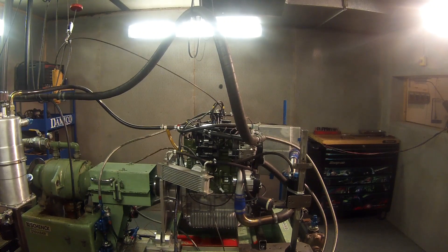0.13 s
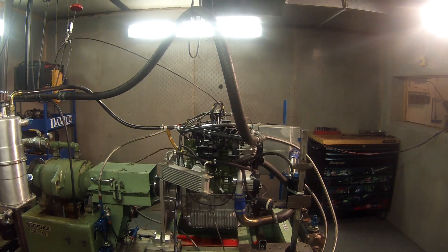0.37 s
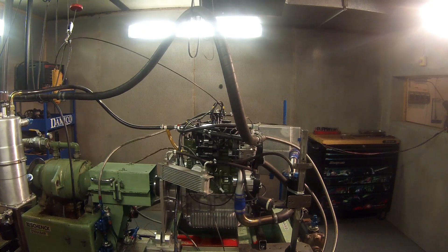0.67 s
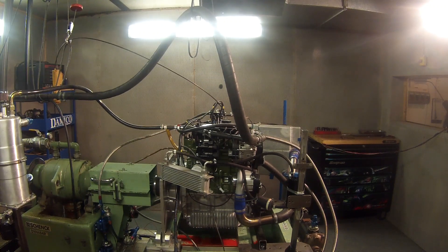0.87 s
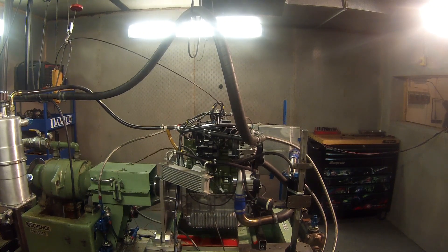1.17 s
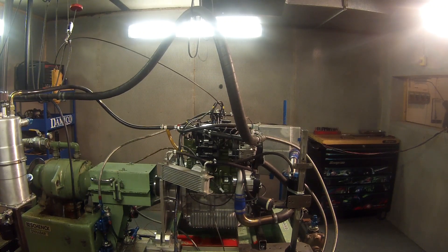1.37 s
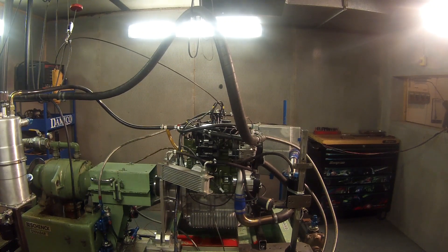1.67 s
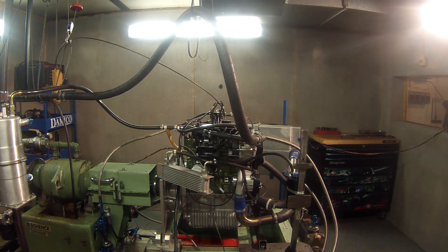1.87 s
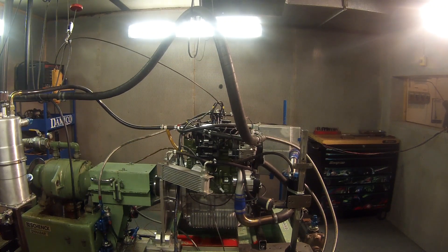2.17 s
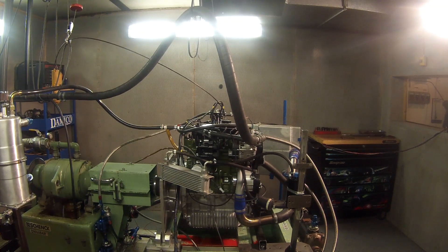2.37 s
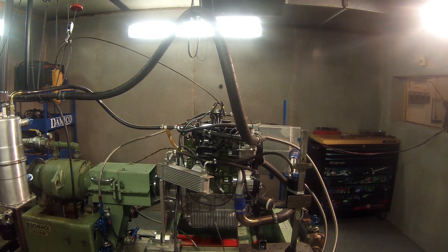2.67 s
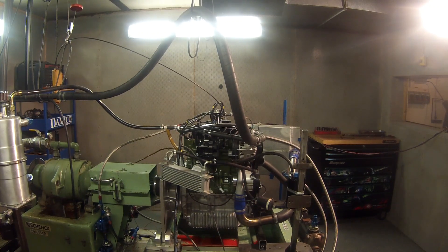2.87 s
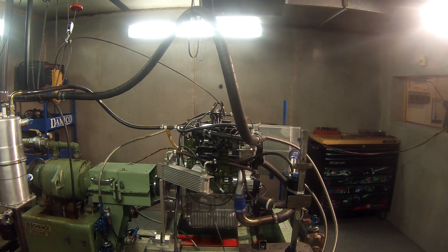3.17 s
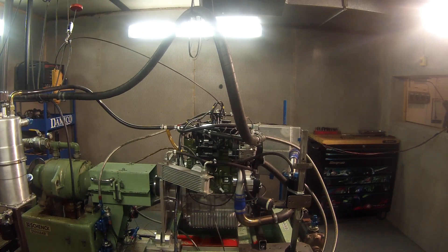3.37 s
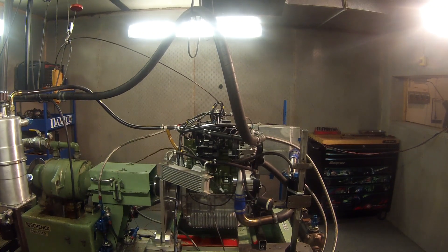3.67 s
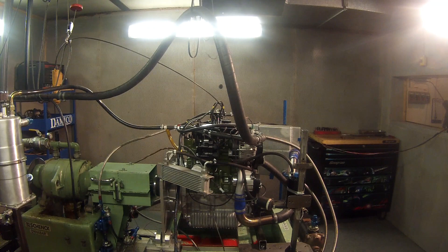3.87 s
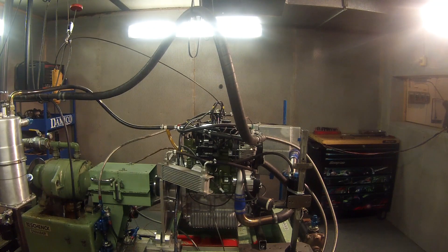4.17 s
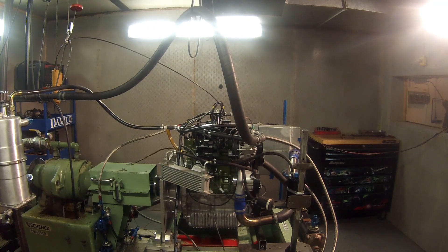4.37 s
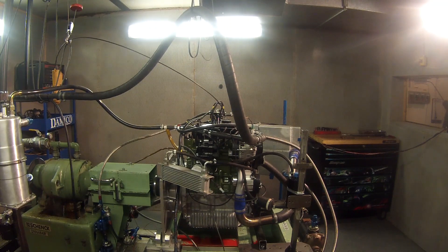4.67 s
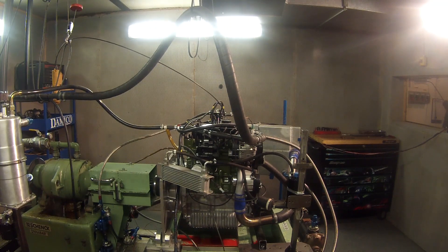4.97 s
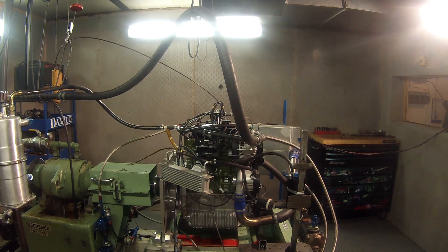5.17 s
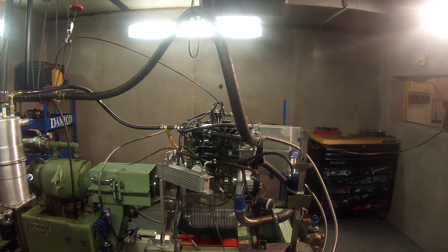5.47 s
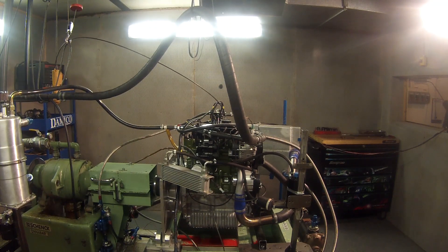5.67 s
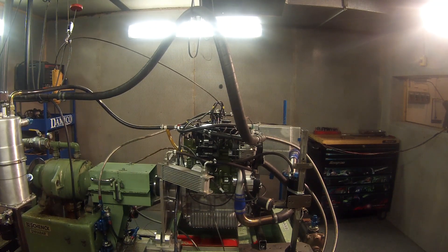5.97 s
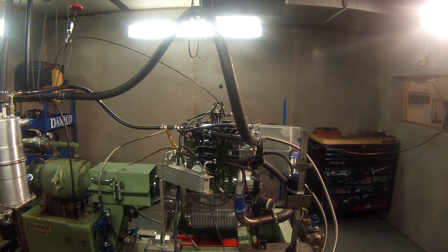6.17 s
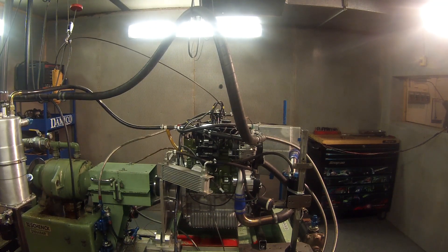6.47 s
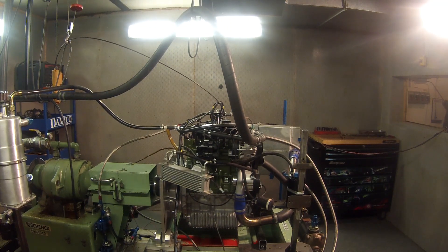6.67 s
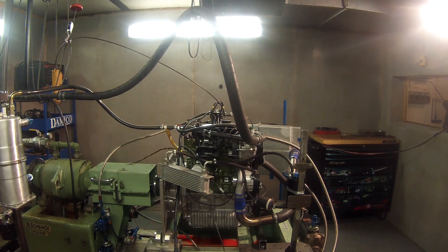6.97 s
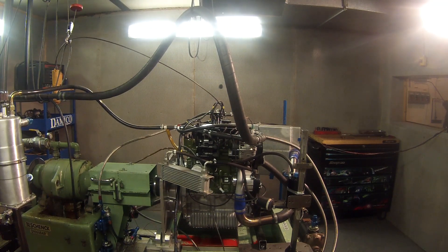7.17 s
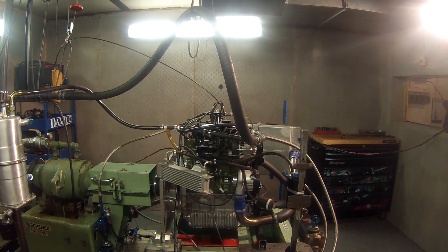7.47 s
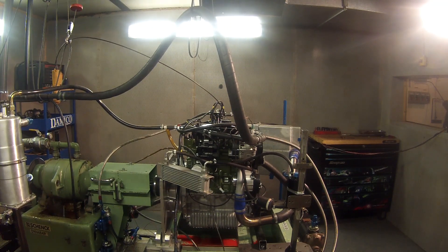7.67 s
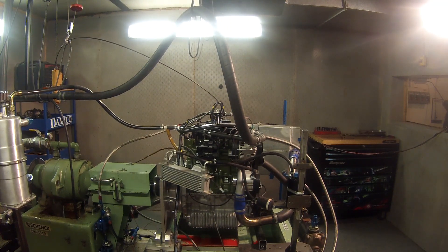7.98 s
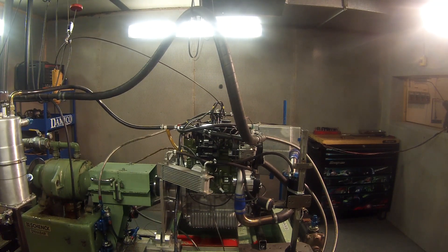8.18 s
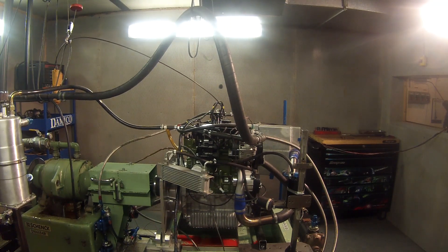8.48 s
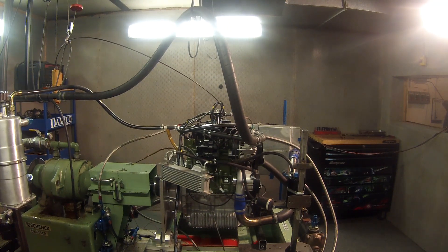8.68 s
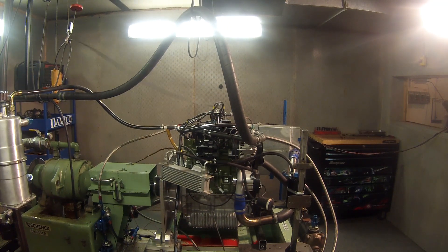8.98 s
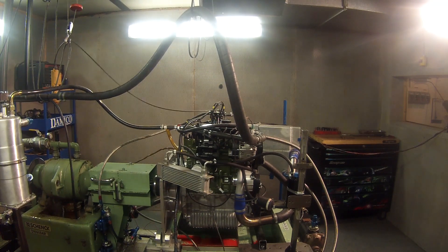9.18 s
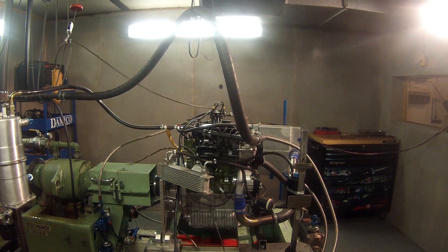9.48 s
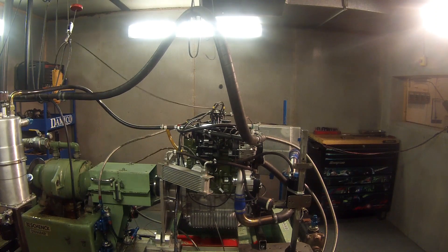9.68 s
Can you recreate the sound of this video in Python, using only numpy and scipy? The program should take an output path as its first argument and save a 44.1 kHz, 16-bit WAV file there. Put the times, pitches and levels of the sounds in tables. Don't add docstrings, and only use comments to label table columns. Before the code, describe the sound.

In a hard-walled test cell, a supercharged four-cylinder engine roars at constant high revs: a strong low firing drone near 200 Hz, piercing metallic ringing near 3.7 kHz, rushing air and a flickering 10 kHz blower whistle. At about nine seconds the throttle shuts; the roar collapses into quick bright puffs of air, twelve a second, over falling, misfiring low tones that boom in the room. One fixed microphone, loud and slightly compressed.

```python
import sys
import numpy as np
from scipy import signal
from scipy.fft import rfft, irfft, next_fast_len
from scipy.io import wavfile

SR = 44100
rng = np.random.default_rng(int(sys.argv[2]) if len(sys.argv) > 2 else 0)


def natural_amplitude(level_db):
    exponent = np.asarray(level_db, float) / 20
    return 10 ** exponent


def log_audio(samples):
    frames = np.atleast_2d(samples).T
    limited = np.clip(frames, -1, 1)
    pcm = np.round(limited * 32767).astype(np.int16)
    wavfile.write(sys.argv[1], SR, pcm)


N = 433923
TIME = np.arange(N) / SR
HELD_HZ = 49.868

# time in seconds, level in dB.
LOAD_DB = [(0, 0.1), (1, -0.5), (2, 0.55), (3.3, -0.1), (4, 0.1), (7, -0.1), (8.25, 0.65), (8.6, 0.5),
           (9.84, 1.5)]
# centre in Hz, width in Hz, # level in the rush in dB, level
# in the surge in dB.
RESONANCE_PEAKS = [(2101, 69, -55, 0.5), (2294, 44, -66.5, -1), (3687, 240, -53.5, 0.5),
                   (4030, 320, -58.5, -18), (4245, 83, -57, 1), (4580, 60, -63, -4), (4890, 190, -56, -1),
                   (5100, 73, -78, -6), (5760, 220, -58, 0), (6440, 120, -61, -1), (7000, 160, -61, -15),
                   (7560, 140, -73.5, -13), (8380, 340, -64, -5.5), (8690, 130, -63, -2.5),
                   (9920, 1100, -66, -18), (10740, 750, -64.5, -8), (12600, 760, -73, -22),
                   (15100, 300, -82, -30)]


def engine(cycles):
    # multiple of the cycle rate, level in dB rms.
    exhaust_lines = [(1, -54.2), (2, -48.4), (3, -49.2), (4, -23.3), (5, -51.6), (6, -45.6), (7, -60.3),
                     (8, -36.2), (9, -50.2), (10, -44.7), (11, -61.3), (12, -35.1), (13, -52.4),
                     (14, -45.6), (15, -55.8), (16, -47.4), (17, -57.5), (18, -36.3), (19, -49.4),
                     (20, -46.4), (21, -64.3), (22, -58.7), (23, -47.4), (24, -51.0), (25, -69.3),
                     (26, -46.8), (27, -43.6), (28, -53.3), (29, -62.8), (30, -39.6)]
    intake_lines = [(31, -42.1), (32, -46.8), (34, -39.9), (35, -45.3), (36, -46.0), (37, -39.2),
                    (38, -39.1), (39, -44.9), (40, -45.4), (41, -35.2), (42, -35.3), (43, -31.5),
                    (45, -49.4), (46, -36.2), (47, -35.8), (48, -45.1), (49, -49.5), (50, -36.9),
                    (51, -46.3), (53, -39.3), (54, -47.7), (56, -48.0), (57, -42.1), (58, -43.8),
                    (59, -47.0), (60, -45.9), (61, -49.2), (62, -37.2), (63, -40.7), (65, -39.8)]
    block_lines = [(67, -36.0), (69, -38.7), (70, -34.3), (71, -31.8), (72, -38.2), (73, -24.6),
                   (74, -31.2), (75, -27.8), (76, -30.4), (77, -34.9), (78, -34.1), (79, -42.8),
                   (80, -30.1), (81, -44.2), (82, -39.7), (83, -37.1), (84, -41.0), (85, -34.0),
                   (86, -36.6), (87, -42.7), (88, -46.7), (89, -38.4), (91, -39.1), (93, -41.9),
                   (95, -46.5), (96, -44.4), (97, -43.3), (98, -36.7), (99, -35.5), (100, -45.7)]
    valve_lines = [(101, -43.7), (102, -42.0), (103, -33.6), (106, -41.7), (107, -39.3), (109, -44.4),
                   (111, -42.4), (112, -44.7), (114, -38.5), (115, -35.9), (116, -42.6), (117, -39.6),
                   (118, -37.9), (119, -45.5), (122, -45.7), (123, -39.6), (126, -45.5), (127, -42.1),
                   (129, -43.9), (131, -35.1), (135, -41.5), (136, -40.8), (139, -38.7), (140, -41.1),
                   (142, -45.6), (144, -40.8), (147, -42.3), (148, -39.7), (150, -44.2), (152, -45.7),
                   (161, -46), (168, -47), (184, -52), (192, -49)]
    load_db = curve(LOAD_DB)
    exhaust_cut_db = cut_db(9.045, 500)
    intake_cut_db = cut_db(9.02, 300)
    ring_cut_db = cut_db(8.985, 280)

    pipe = lines(exhaust_lines[1:8], cycles, sway_db=0.48, slip_rad=0.09, rate_hz=2.3, spread=0.25)
    pipe += shake(cycles)
    metal = lines(exhaust_lines[8:], cycles, sway_db=1.2, slip_rad=0.1, rate_hz=1.2, spread=0.15)
    metal += natural_amplitude(0.2) * lines(intake_lines, cycles, sway_db=1.6, slip_rad=0.28, rate_hz=3.5, spread=0.13)
    metal *= natural_amplitude(intake_cut_db - ring_cut_db)
    metal += natural_amplitude(-0.26) * lines(block_lines, cycles, sway_db=1.6, slip_rad=0.35, rate_hz=6.0, spread=0.29)
    ticking = valve_lines
    metal += natural_amplitude(-0.54) * lines(ticking, cycles, sway_db=2.5, slip_rad=0.55, rate_hz=4.5, spread=0.21)
    return natural_amplitude(load_db + exhaust_cut_db) * pipe + natural_amplitude(load_db - 0.16 + ring_cut_db) * metal


def lines(orders, cycles, sway_db, slip_rad, rate_hz, spread):
    out = np.zeros(N)
    cylinder = rng.integers(0, 4, 40)
    for multiple, level_db in orders:
        k = round(multiple)
        sway = drift(rate_hz)
        turns = k * (cycles - cylinder[(k + 2) // 6] / 4)
        scatter = spread * (2 if k < 40 else 1)
        angle = 2 * np.pi * (turns + scatter * rng.standard_normal()) + slip_rad * drift(rate_hz)
        sine = np.sin((angle % (2 * np.pi)).astype(np.float32))
        out += natural_amplitude(level_db + 3) * (1 + sway_db / 8.7 * sway) * sine
    return out


def whistle(cycles):
    gear_multiple = 200.36
    angle = 2 * np.pi * gear_multiple * cycles + 0.7 * drift(12.0) + 2.7 * drift(3.0)
    level_db = -33 + cut_db(8.965, 530) + 3 + 2.2 * drift(15.0)
    return natural_amplitude(level_db) * np.sin(angle)


def rush(cycles):
    # frequency in Hz, level in dB per Hz.
    rush_spectrum = [(20, -79), (45, -85), (150, -72.5), (500, -77), (1050, -76.5), (1400, -69.5),
                     (2800, -67), (3300, -61), (7300, -61.5), (7800, -65.5), (9100, -68), (11700, -73.5),
                     (14000, -78.5), (16000, -80)]
    hardness_by_cylinder = [1, -0.076, -0.64, -0.44]
    peaks = [(hz, width_hz, level_db) for hz, width_hz, level_db, _ in RESONANCE_PEAKS]

    firing = 4 * cycles
    hardness_db = np.array(hardness_by_cylinder)[firing.astype(int) % 4]
    gate_db = hardness_db + 4.5 * (np.exp(-3.0 * (firing % 1)) - 0.3)
    shared_db = 0.5 * drift(4.2)
    low = air(rush_spectrum, peaks, 10, 1190) * natural_amplitude(0.61 * drift(5.0))
    middle = air(rush_spectrum, peaks, 1300, 7600) * natural_amplitude(0.8 * gate_db + shared_db + 0.4 * drift(8.0))
    high = air(rush_spectrum, peaks, 7600, 30000) * natural_amplitude(1.1 * gate_db + shared_db + 0.25 * drift(8.0))

    left_db = -7.5
    air_db = 0.52 * curve(LOAD_DB) + 0.18 + np.maximum(cut_db(9.035, 170), left_db)
    air_db += 20 * np.log10(speed() / HELD_HZ)
    closing_db = np.minimum(air_db - 0.5, 0)
    return natural_amplitude(air_db) * (natural_amplitude(-0.4 * closing_db) * low + middle + natural_amplitude(0.56 * closing_db) * high)


def surge():
    # frequency in Hz, level in dB per Hz.
    surge_spectrum = [(300, -17), (1300, -21), (1750, -6.5), (3070, -13.5), (4900, -8.5), (7600, -14.5),
                      (9500, -16.5), (11500, -22), (15000, -23)]
    peaks = [(hz, width_hz, level_db) for hz, width_hz, _, level_db in RESONANCE_PEAKS]
    middle = air(surge_spectrum, peaks, 200, 7200) * natural_amplitude(-33.5 + 1.4 * drift(30.0))
    middle *= puffs(rise_s=0.015, sag_s=0.087, fall_s=0.067, body=0.9, lead_s=0.02)
    high = air(surge_spectrum, peaks, 7300, 11100) * natural_amplitude(-30 + 1.7 * drift(30.0))
    high *= puffs(rise_s=0.0055, sag_s=0.049, fall_s=0.024, body=0, lead_s=0.014)
    top = air(surge_spectrum, peaks, 12800, 30000) * natural_amplitude(-33)
    top *= puffs(rise_s=0.0063, sag_s=0.076, fall_s=0.011, body=0.5, lead_s=0.013)
    return middle + high + top


def puffs(rise_s, sag_s, fall_s, body, lead_s):
    # time in seconds, peak in dB, blowing time in seconds, middle band against the top in dB.
    surge_puffs = [
        (9.018, -12.5, 0.051, 4),
        (9.111, -14.5, 0.045, 1.3),
        (9.1998, -14.5, 0.052, 0.5),
        (9.2856, -13.5, 0.046, -0.8),
        (9.369, -14, 0.043, -0.5),
        (9.4512, -13.5, 0.036, -1.5),
        (9.53, -12.5, 0.045, -2),
        (9.6113, -14.5, 0.036, -0.5),
        (9.6911, -13.5, 0.032, -1),
        (9.764, -15, 0.049, -0.5),
    ]
    out = np.zeros(N)
    for start_s, level_db, blowing_s, middle_db in surge_puffs:
        age_s = np.maximum(TIME - start_s + lead_s, 0)
        decay = np.exp(-age_s / sag_s - np.maximum(age_s - blowing_s, 0) / fall_s)
        out += natural_amplitude(level_db + body * middle_db) * (1 - np.exp(-age_s / rise_s)) ** 2 * decay
    return out


def coast(cycles):
    # multiple of the cycle rate, level in dB rms.
    coast_tones = [(2, -50), (4, -46), (6, -56), (8, -54), (10, -57.5), (12, -59.5), (16, -63), (20, -67)]
    # time in seconds, level in dB.
    burning = [
        (9.12, -22),
        (9.16, 7),
        (9.27, 0),
        (9.43, -10),
        (9.5, 6),
        (9.59, -8),
        (9.64, 2),
        (9.705, -9),
        (9.76, 4),
    ]
    # start in seconds, peak in dB, frequency in Hz, t60
    # in seconds.
    pops_and_booms = [
        (8.2, -36, 790, 0.31),
        (9.035, -34, 117, .3),
        (9.15, -36, 505, .4),
        (9.555, -23, 242, 0.16),
        (9.56, -35, 340, .1),
        (9.06, -31, 184, 0.33),
        (9.57, -27, 170.0, 0.94),
        (9.58, -38, 115.0, .3),
    ]
    burning_db = curve(burning)
    caught = np.clip((TIME - 9.6) / 0.05, 0, 1)
    tones = 0
    for multiple, level_db in coast_tones:
        k = round(multiple)
        on_firing = k % 4 == 0
        firing_db = on_firing * caught * (4.5 + 0.5 * k) + 2.0 * drift(11.0)
        firing_db += burning_db * (1 if k == 4 else 0.35)
        angle = 2 * np.pi * (k * cycles + rng.random()) + 0.26 * drift(10.0)
        tones += natural_amplitude(level_db + firing_db + 1) * np.sin(angle)
    out = cell(np.clip((TIME - 9.06) / 0.08, 0, 1) * tones + natural_amplitude(-50) * misfire())

    low_boom_hz, growth_db_per_s = 46.0, 19
    low_boom_db = -46 + growth_db_per_s * since(9.1, 0.01) + cut_db(9.76, 200) + 1.5 * drift(8.0)
    low_boom = natural_amplitude(low_boom_db + 3) * np.sin(2 * np.pi * low_boom_hz * TIME + 0.5 * drift(5.0))
    out += np.clip((TIME - 9.05) / 0.1, 0, 1) * low_boom

    for start_s, level_db, hz, t60_s in pops_and_booms:
        age_s = np.maximum(TIME - start_s, 0)
        envelope = natural_amplitude(level_db - 60 * age_s / t60_s) * (1 - np.exp(-age_s / 0.0079))
        out += envelope * np.sin(2 * np.pi * hz * age_s)
    return out


def misfire():
    # time in seconds, level over the rumble in dB, half length in seconds.
    misfire_bursts = [
        (9.07, 5, 0.034),
        (9.56, 12.5, 0.038),
    ]
    band = signal.butter(3, [75, 230], "band", fs=SR, output="sos")
    noise = signal.sosfilt(band, rng.standard_normal(N))
    envelope = np.clip((TIME - 9.02) / 0.05, 0, 1)
    for centre_s, level_db, half_s in misfire_bursts:
        envelope += natural_amplitude(level_db) * np.exp(-((TIME - centre_s) / half_s) ** 2)
    return noise / noise.std() * envelope


def shake(cycles):
    pump_hz, beat_peak_s = 47.87, 2.3
    settled = np.clip((TIME - 1.6) / 0.3, 0.3, 1)
    cam = settled * natural_amplitude(-54.5 + 1.5 + 2.5 * drift(0.8)) * np.sin(2 * np.pi * cycles)
    pump_turns = pump_hz * (TIME - beat_peak_s) + np.interp(beat_peak_s, TIME, cycles)
    pump = natural_amplitude(-58.5 + 1 + 2.5 * drift(1.1)) * np.sin(2 * np.pi * pump_turns + 0.3 * drift(0.5))
    return cam + pump


def cell(x):
    # frequency in Hz, width in Hz, level in dB.
    booms = [(72, 6, 15.5), (129, 5, 9), (137, 5, 9), (146, 7.9, 11), (171.5, 4.5, 22), (246, 12, 12.5),
             (340, 19, 8), (400, 55, 10.5), (500, 22, 5), (650, 25, 4)]
    out = x.copy()
    for hz, width_hz, level_db in booms:
        r = np.exp(-np.pi * width_hz / SR)
        poles = [1, -2 * r * np.cos(2 * np.pi * hz / SR), r * r]
        out += natural_amplitude(level_db) * (1 - r * r) / 2 * signal.lfilter([1, 0, -1], poles, x + 1e-18)
    return out


def speed():
    rest_hz, run_down_s = 12, 1.2
    hunt = sum(np.sin(2 * np.pi * rate_hz * TIME) for rate_hz in (1.7, 3.9))
    held_hz = HELD_HZ + 0.3 * np.exp(-TIME / 0.25) + 0.025 * hunt
    return rest_hz + (held_hz - rest_hz) * np.exp(-since(8.99, 0.02) / run_down_s)


def cut_db(start_s, db_per_s):
    return -db_per_s * since(start_s, 0.02)


def since(start_s, soft_s):
    return soft_s * np.logaddexp(0, (TIME - start_s) / soft_s)


def air(spectrum, peaks, low_hz, high_hz):
    size = next_fast_len(N)
    hz = np.arange(1, size // 2 + 2) * SR / size
    points_hz, points_db = np.transpose(spectrum)
    power = natural_amplitude(np.interp(np.log(hz), np.log(points_hz), points_db)) ** 2
    for centre_hz, width_hz, level_db in peaks:
        power += natural_amplitude(level_db) ** 2 / (1 + (2 * (hz - centre_hz) / width_hz) ** 2) ** 2
    power *= 1 / (1 + (low_hz / hz) ** 6) - 1 / (1 + (high_hz / hz) ** 6)
    return irfft(rfft(rng.standard_normal(size)) * np.sqrt(power * SR / 2), size)[:N]


def drift(rate_hz):
    r = np.exp(-128 * np.pi * rate_hz / SR)
    noise = rng.standard_normal(N // 64 + 1002)
    slow = signal.lfilter([1], [1, -2 * r, r * r], noise)[1000:]
    slow = slow / slow.std()
    ramps = np.diff(slow)[:, None] * np.arange(64) / 64
    return (slow[:-1, None] + ramps).ravel()[:N]


def curve(rows):
    s, db = np.transpose(rows)
    return np.interp(TIME, s, db)


def scene():
    cycles = np.cumsum(speed()) / SR
    mono = -engine(cycles) + whistle(cycles) + rush(cycles) + surge() + coast(cycles)
    return np.stack([mono, mono])


def band_limit(x):
    return signal.sosfilt(signal.butter(12, 15820, fs=SR, output="sos"), x)


def record(dry):
    rounded = 1.245 * np.tanh(dry / 1.154)
    top_cut = signal.ellip(16, 0.5, 70, 15300, fs=SR, output="sos")
    return band_limit(signal.sosfilt(top_cut, rounded))


dry = scene()
out = record(dry)
log_audio(out)
```